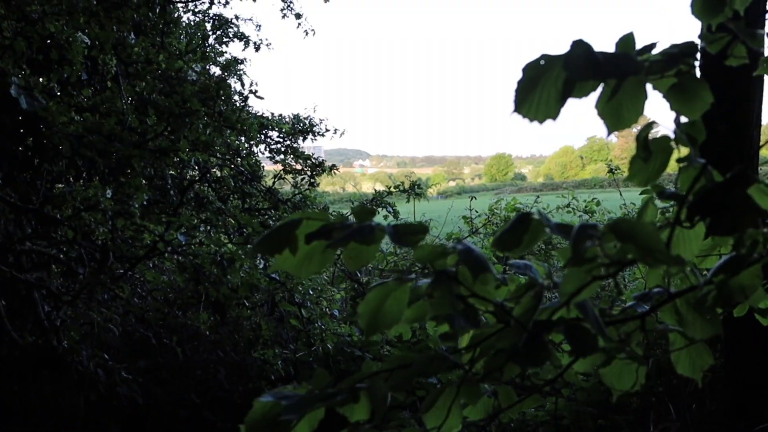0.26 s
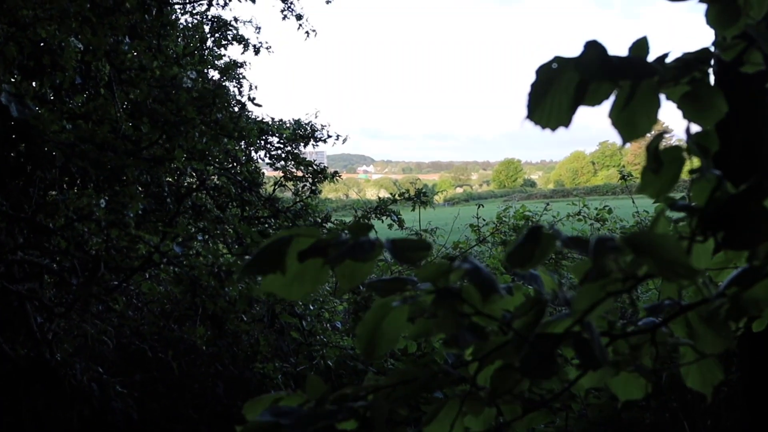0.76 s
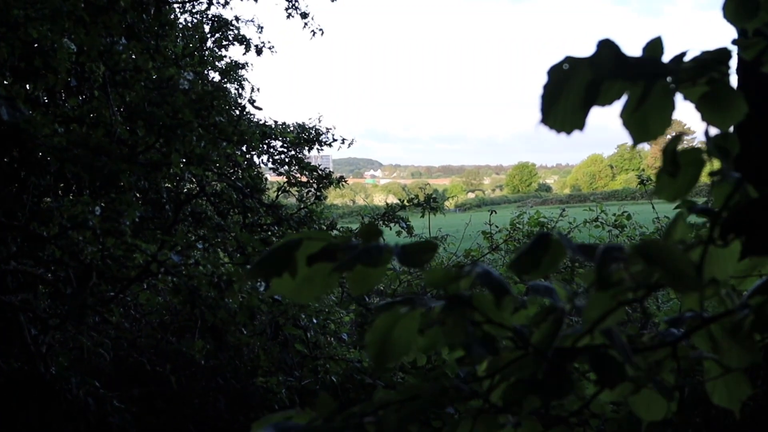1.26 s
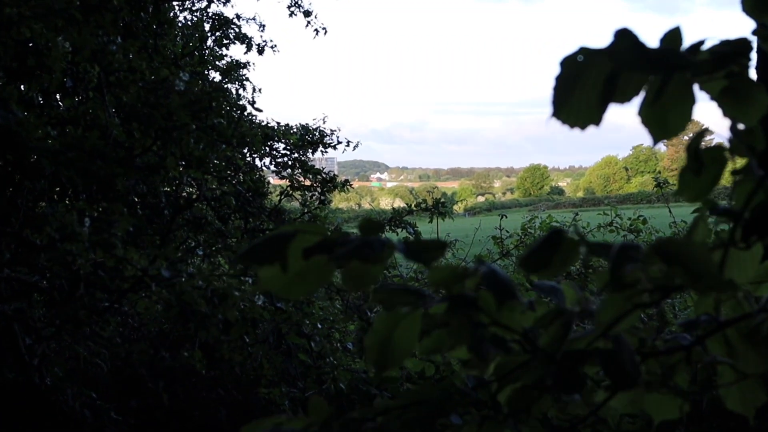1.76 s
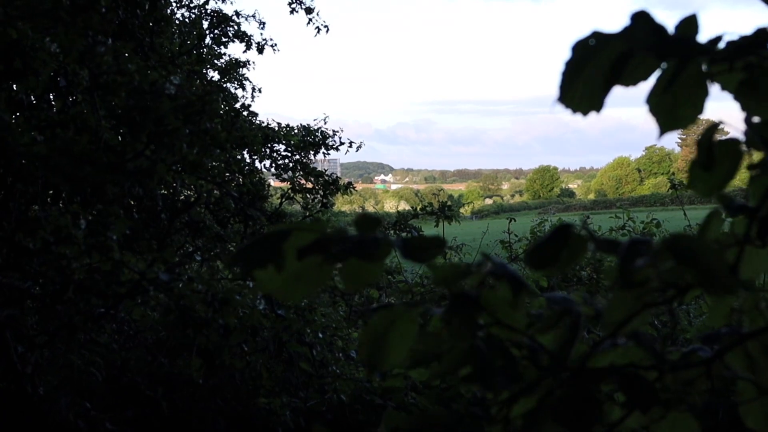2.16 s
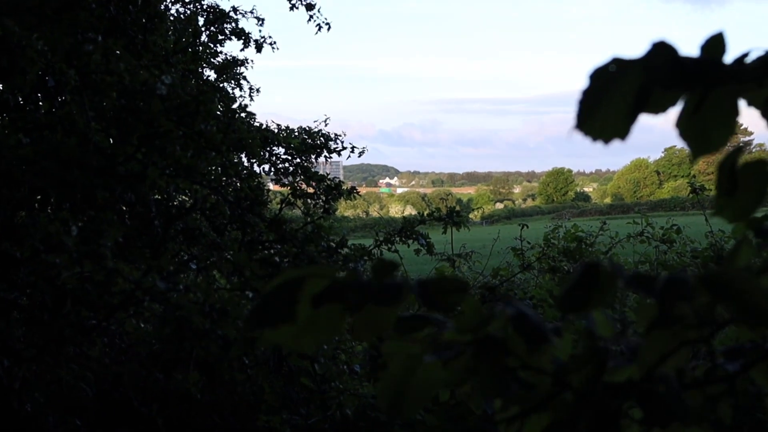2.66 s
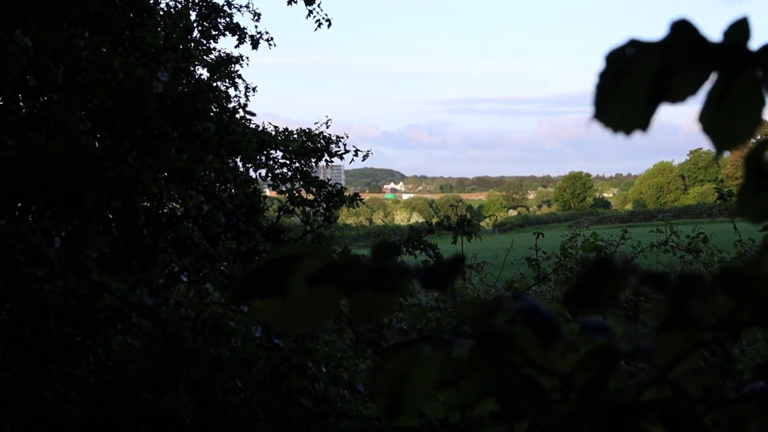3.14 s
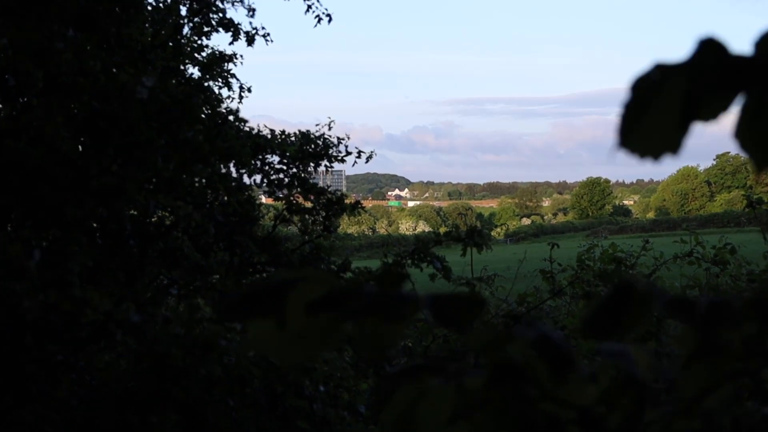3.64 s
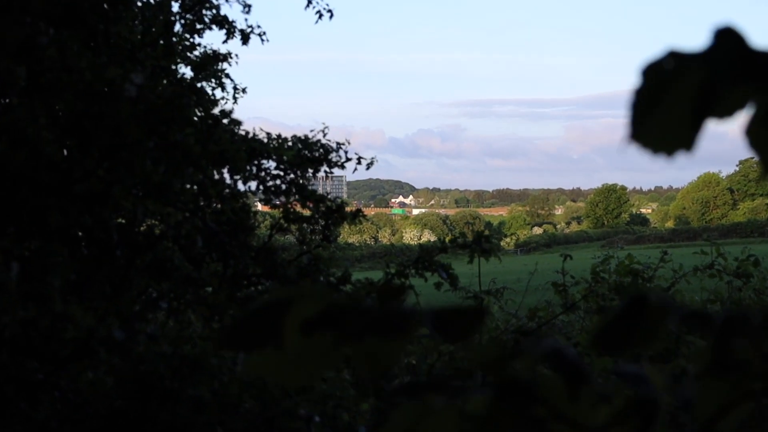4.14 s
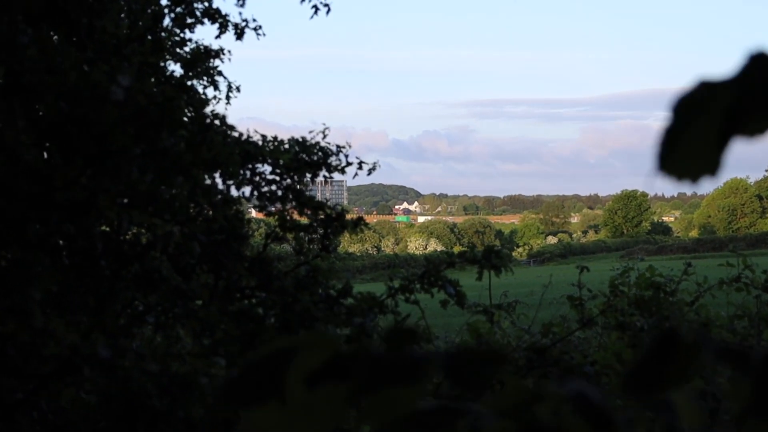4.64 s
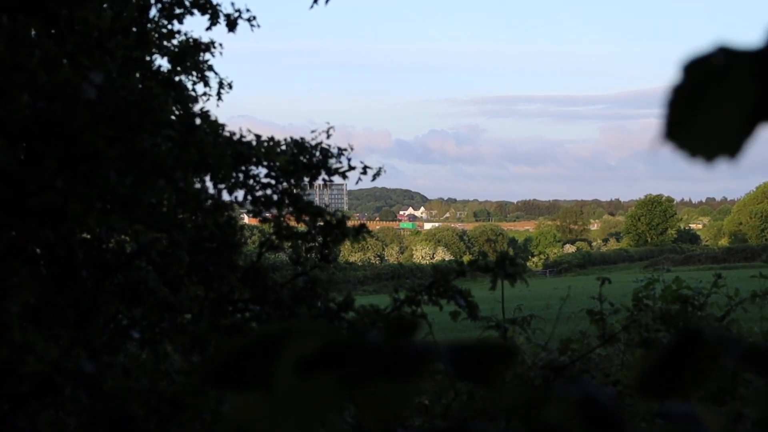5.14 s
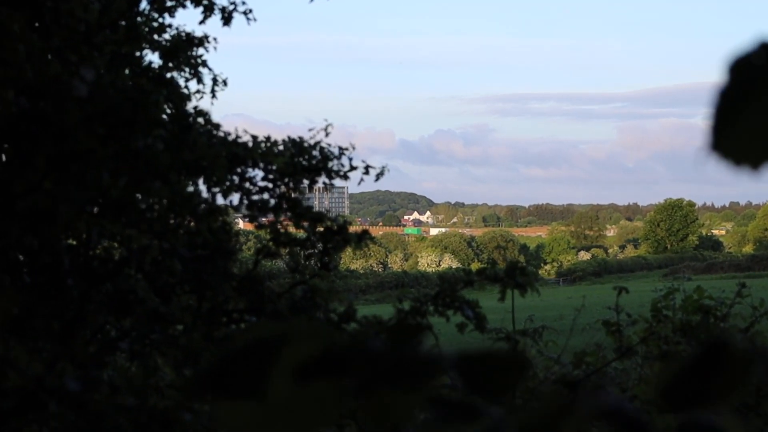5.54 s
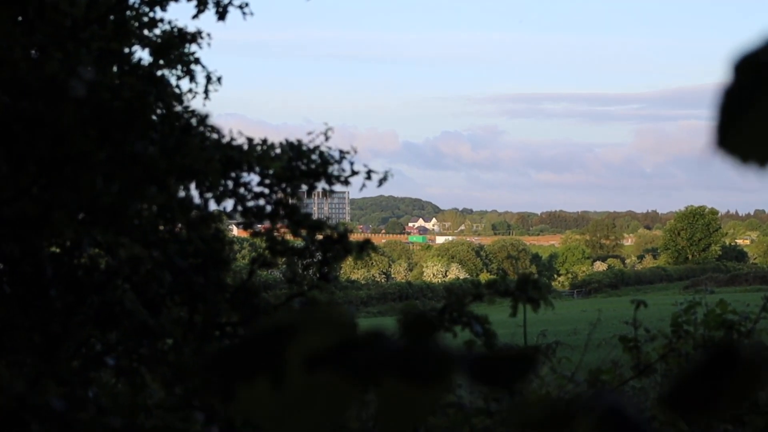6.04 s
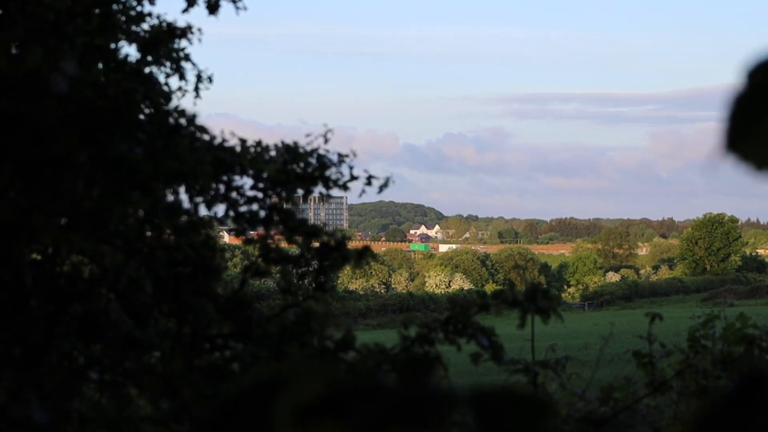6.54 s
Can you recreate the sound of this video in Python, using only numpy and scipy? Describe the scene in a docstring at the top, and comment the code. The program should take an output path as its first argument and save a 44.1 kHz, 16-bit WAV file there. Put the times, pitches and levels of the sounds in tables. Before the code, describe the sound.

Small songbirds sing a dawn chorus at the edge of a wood, their notes lightly echoing among the trees. It opens with loud, high whistles and a quavering call from the treetops, over a dense wash of distant chirping. From about 1 to 2 seconds a buzzing trill pulses four times, while a fainter bird repeats a falling whistle. At about 2 seconds a close warbler starts a fast twitter of sliding chirps, stutters and short buzzes, running into a string of raspy repeated notes that ends near 4.3 seconds. Softer piping and thin high whistles follow until about 5 seconds. Then one bird repeats a bright chink in small groups until around 5.6 seconds, and once more at 6.3. The warbler returns with a brief chirp and buzz near 6.7 seconds. The distant chorus thins gradually, and a faint rush of air lies underneath throughout.

```python
"""A close warbler twitters and buzzes in a dawn chorus at the edge of a wood, over open fields.
Other small birds whistle and trill deeper among the trees. Each note is a near-pure syrinx tone:
it glides for a slur, swings fast in pitch for a buzz. Trunks and leaves scatter the notes.
Behind them lie a thinning distant chorus and a faint rush of air."""
import sys
import numpy as np
from scipy import signal
from scipy.io import wavfile
from scipy.ndimage import uniform_filter1d

SR = 44100
rng = np.random.default_rng(int(sys.argv[2]) if len(sys.argv) > 2 else 0)


def transcribe(u):
    """Save the signal u as a 16-bit wav file named by the first command-line argument.

    u: samples, shape (n,) or (channels, n), limited to [-1, 1]; the rate is SR.
    q: integer samples, one column per channel.
    """
    v = np.clip(np.atleast_2d(u).T, -1, 1)
    q = np.round(v * 32767).astype(np.int16)
    wavfile.write(sys.argv[1], SR, q)


N = 299439


def warbler():
    """Close song: slurs, arches, stutter, flicks, purr and buzzes, then a run of couplets."""
    # start_s, length_s, start_hz, end_hz, level_db
    slurs = [(2.092, 0.032, 4150, 5020, -59.5), (2.136, 0.075, 4474, 3467, -45),
             (2.306, 0.024, 5470, 5160, -54.5), (2.356, 0.034, 5040, 5000, -56),
             (2.301, 0.034, 3397, 3497, -44), (2.449, 0.051, 3790, 4320, -46),
             (2.501, 0.016, 4330, 4730, -48), (2.562, 0.031, 4810, 3950, -46.5),
             (2.718, .014, 3050, 3360, -55), (2.909, 0.032, 3494, 3316, -47.5),
             (3.002, 0.05, 2704, 3226, -51), (3.007, 0.019, 3970, 3560, -52.5),
             (3.081, 0.028, 2480, 2315, -63), (3.313, 0.06, 4566, 4092, -49),
             (3.526, 0.015, 5230, 5450, -57.5), (3.616, 0.085, 4140, 4117, -53),
             (3.74, 0.053, 3995, 4193, -52.5), (6.657, 0.019, 4860, 4035, -45)]
    # start_s, level_db
    flicks = [(2.825, -66.5), (2.965, -63), (3.107, -61), (3.247, -57.5)]
    # length_s, start_hz, middle_hz, end_hz
    flick_shape = (0.015, 5100, 5000, 3200)
    # start_s, length_s, top_hz, level_db
    arches = [(2.332, 0.058, 3965, -46), (3.539, 0.069, 4010, -52.5), (3.852, 0.068, 3453, -57.5)]
    # start_s, length_s, start_hz, end_hz, level_db, swing_rate_hz
    buzz_notes = [(2.542, 0.12, 2925, 2867, -61.5, 49), (2.635, 0.031, 4185, 5970, -53, 112),
                  (2.867, 0.035, 4145, 4160, -48, 86), (3.053, 0.04, 2950, 2520, -59.5, 146),
                  (3.276, 0.039, 4020, 4500, -50, 97), (3.307, 0.055, 4660, 4360, -54.5, 150),
                  (5.952, 0.097, 3660, 3185, -65.5, 53), (6.762, 0.029, 4075, 3870, -50, 106)]
    # clear notes, each led by a rasp: start_s, pitch_hz, level_db
    couplets = [(3.214, 3910, -54.5), (3.43, 3980, -49.5), (3.679, 3800, -54.5), (3.797, 3800, -55.5),
                (3.918, 3890, -53.5), (4.036, 3848, -54.5), (4.164, 3830, -58), (4.286, 4040, -55)]
    # reflections off near trunks: delay_s, gain_db
    trunk_echoes = [(.019, -8.5), (0.041, -16.5)]
    notes = [slur(*row) for row in slurs] + stutter() + [(s, *flick_shape, db) for s, db in flicks]
    pure = whistles(notes, waver=.021, taper=.5)
    for s, length_s, top_hz, db in arches:
        add(pure, s, gain_of(db) * arch(length_s, top_hz))
    buzz = buzzes([buzzy(*row) for row in buzz_notes], throb=1, unevenness=.15, taper=.6)
    buzz += buzzes([rasp(s, db) for s, _, db in couplets], throb=0, unevenness=.23, taper=.93)
    clear_s, drop_hz = .032, 211
    clear_notes = [slur(s, clear_s, hz + drop_hz / 2, hz - drop_hz / 2, db) for s, hz, db in couplets]
    clear = whistles(clear_notes, waver=.016)
    song = (trees(pure, direct_db=-1, leaves_db=-4, wood_db=-8.5, leaves_t60_s=.17)
            + trees(buzz, direct_db=-4, leaves_db=-1.5, wood_db=-10, leaves_t60_s=.1)
            + trees(clear, direct_db=-.5, leaves_db=-5, wood_db=-12, leaves_t60_s=.14))
    for delay_s, db in trunk_echoes:
        add(song, delay_s, gain_of(db) * pure)
    return song + purr()


def arch(length_s, top_hz, rise_share=.68, fall_db=-5):
    """One unbroken note: a rise turning sharply into a softer fall."""
    rise_s = length_s * rise_share
    _, up_hz = contour(rise_s, *sag(.88 * top_hz, top_hz))
    _, down_hz = contour(length_s - rise_s, *sag(top_hz, .72 * top_hz))
    fade_db = np.concatenate([np.zeros(len(up_hz)), np.linspace(0, fall_db, len(down_hz))])
    return syrinx(np.concatenate([up_hz, down_hz]), gain_of(fade_db), taper=.21)


def stutter(start_s=2.497, step_s=.0203, count=4, first_db=-55, growth_db_per_s=49.5):
    """Whistle rows: even falling chips, each louder."""
    # length_s, start_hz, middle_hz, end_hz
    chip_shape = (0.012, 5330, 4950, 4400)
    return [(start_s + t, *chip_shape, first_db + growth_db_per_s * t) for t in step_s * np.arange(count)]


def purr(start_s=2.7305, step_s=.0141, count=5, first_db=-44, growth_db_per_s=78.5, climb_per_s=.9):
    """Even rising chips, each louder and higher."""
    # length_s, start_hz, middle_hz, end_hz
    chip_shape = (.012, 3280, 3480, 3680)
    length_s, *pitches_hz = chip_shape
    chips = []
    for t in step_s * np.arange(count):
        raised_hz = np.multiply(pitches_hz, 1 + climb_per_s * t)
        chips.append((start_s + t, length_s, *raised_hz, first_db + growth_db_per_s * t))
    song = whistles(chips, waver=.015, taper=1)
    return trees(song, direct_db=0, leaves_db=-8.5, wood_db=-11, leaves_t60_s=.12)


def rasp(note_s, note_db, lead_s=.046, length_s=.037, swing_hz=630, swing_rate_hz=160):
    """Buzz row: a softer, arched rasp just ahead of a clear note."""
    pitches_hz = 4050, 4550, 3900
    return note_s - lead_s, length_s, *pitches_hz, note_db - 7, swing_hz, swing_rate_hz


def canopy_birds():
    """Held whistles, a loud quavering call, buzzes and a trill, high up and blurred by the wood."""
    # start_s, length_s, pitch_hz, level_db
    held_notes = [(0.098, 0.062, 5465, -39), (.19, 0.093, 5456, -45.5), (.203, 0.079, 3970, -40),
                  (.3, 0.086, 3863, -49.5), (.63, 0.11, 3730, -58.5), (0.702, 0.093, 3954, -56),
                  (0.954, 0.075, 4456, -53.5), (1.745, 0.18, 7740, -45.5), (1.852, 0.12, 7670, -46)]
    # start_s, length_s, start_hz, middle_hz, end_hz, level_db, swing_hz, swing_rate_hz
    quaver = (0.1, 0.2556, 5902.5, 5828, 5649.5, -40.5, 150, 139.5)
    # start_s, length_s, start_hz, end_hz, level_db, swing_rate_hz
    buzz_notes = [(0, 0.058, 4700, 4680, -48, 102), (0.232, 0.1, 3762, 3512, -45.5, 99),
                  (0.849, .2, 4550, 4650, -55.5, 98), (0.945, 0.14, 7600, 7410, -47.5, 106),
                  (1.025, .05, 6610, 5580, -48.5, 110), (1.04, 0.87, 4480, 4536, -47, 74),
                  (2.935, 0.064, 4160, 3317, -54.5, 76), (3.058, .11, 3720, 4340, -56.5, 80),
                  (3.168, 0.05, 4200, 3944, -51, 61), (3.683, 0.056, 7000, 6580, -71.5, 76),
                  (4.121, 0.081, 7620, 7620, -74, 78)]
    pure = whistles([held(*row) for row in held_notes], waver=.005, taper=.3)
    pure += buzzes([quaver], throb=0, unevenness=.3, taper=.5)
    buzz = buzzes([buzzy(*row) for row in buzz_notes] + trill(), throb=.35, unevenness=.2, taper=.45)
    return (trees(pure, direct_db=-3.5, leaves_db=-5, wood_db=-11, leaves_t60_s=.25)
            + trees(buzz, direct_db=-5, leaves_db=-2.5, wood_db=-7, leaves_t60_s=.22))


def trill(start_s=1.056, step_s=.164, count=4, first_db=-42.5, fade_db_per_s=1.6):
    """Buzz rows: even surges of one wide buzz, each slightly weaker."""
    # length_s, start_hz, middle_hz, end_hz
    surge_shape = (.15, 5350, 5280, 4700)
    swing_hz, swing_rate_hz = 843, 57
    return [(start_s + t, *surge_shape, first_db - fade_db_per_s * t, swing_hz, swing_rate_hz)
            for t in step_s * np.arange(count)]


def clear_singer():
    """Second close bird, in the open: almost dry slurs."""
    # start_s, length_s, start_hz, end_hz, level_db
    slurs = [(3.279, 0.023, 3130, 3360, -52.5), (3.309, 0.023, 3430, 3030, -52),
             (3.39, .039, 3270, 3154, -52)]
    song = whistles([slur(*row) for row in slurs], waver=.004, taper=.35)
    return trees(song, direct_db=0, leaves_db=-18.5, wood_db=-20.5, leaves_t60_s=.1)


def pipers(shimmer_hz=63, shimmer_rate_hz=260):
    """Soft held notes at middle distance; the thin, high ones shimmer in pitch."""
    # both: start_s, length_s, pitch_hz, level_db
    piping_notes = [(4.365, 0.1, 3695, -53), (4.54, 0.034, 3630, -61.5), (4.593, 0.054, 3638, -52)]
    thin_notes = [(4.472, 0.072, 5240, -67.5), (4.548, 0.048, 5260, -59), (4.648, 0.12, 5250, -60),
                  (4.74, 0.1, 5195, -64), (4.944, 0.048, 5240, -64), (5.002, 0.057, 5210, -65)]
    song = whistles([held(*row) for row in piping_notes], waver=.008, taper=.6)
    shimmering = [(*held(*row), shimmer_hz, shimmer_rate_hz) for row in thin_notes]
    song += buzzes(shimmering, throb=0, unevenness=.02, taper=.4)
    return trees(song, direct_db=-.5, leaves_db=-6, wood_db=-11, leaves_t60_s=.2)


def chinker():
    """One bird repeats a bright, slightly falling chink in small groups."""
    # start_s, level_db
    chinks = [(5.076, -57.5), (5.154, -59.5), (5.316, -56.5), (5.357, -59), (5.404, -62.5), (5.558, -59.5),
              (5.593, -58.5), (6.328, -55)]
    # length_s, start_hz, middle_hz, end_hz
    chink_shape = (.036, 4210, 4110, 4070)
    song = whistles([(s, *chink_shape, db) for s, db in chinks], waver=.014, taper=.25)
    return trees(song, direct_db=-2, leaves_db=-5.5, wood_db=-13, leaves_t60_s=.17)


def ticks(length_s=.0031, half_span_hz=1700):
    """Sharp ticks: one very fast downward sweep each."""
    # start_s, level_db, centre_hz
    sweeps = [(0.737, -58.5, 7540), (4.355, -59.5, 7190)]
    out = np.zeros(N)
    for s, db, centre_hz in sweeps:
        _, hz = contour(length_s, centre_hz + half_span_hz, centre_hz, centre_hz - half_span_hz)
        add(out, s, gain_of(db) * syrinx(hz))
    return trees(out, direct_db=6, leaves_db=-.5, wood_db=-16, leaves_t60_s=.059)


def distant_birds(twitter_s=.042, twitter_end_ratio=.86):
    """Deep in the wood: faint slurs, a repeated falling whistle, mellow low notes, twittering."""
    # start_s, length_s, start_hz, end_hz, level_db
    slurs = [(0.133, 0.059, 3590, 2940, -61.5), (.195, 0.086, 2876, 1966, -68.5),
             (0.647, 0.044, 3490, 2700, -65.5), (0.89, 0.023, 3240, 2880, -65),
             (1.15, 0.09, 3020, 3520, -60), (1.34, 0.08, 2950, 3620, -62.5),
             (1.483, 0.057, 3330, 3150, -61.5), (1.611, .06, 2880, 3410, -63),
             (1.807, 0.026, 1770, 2120, -65.5), (1.832, 0.029, 2980, 3410, -60.5),
             (1.938, 0.055, 3500, 2890, -60), (2.005, .12, 2117, 1978, -65.5),
             (1.988, 0.095, 3670, 3090, -61), (2.335, 0.082, 2030, 1625, -74),
             (2.333, 0.078, 2930, 2616, -64.5), (4.11, 0.055, 2775, 3190, -71),
             (5.029, 0.035, 3480, 3650, -64.5), (5.225, 0.05, 3950, 3120, -69.5),
             (5.329, 0.05, 3650, 3026, -62.5), (5.542, 0.058, 2880, 3800, -69),
             (5.698, 0.12, 2665, 3150, -75.5), (5.755, 0.31, 6630, 6180, -77.5),
             (6.041, 0.073, 3230, 2970, -67.5), (6.387, 0.049, 5050, 5680, -71.5),
             (6.395, 0.076, 3470, 3236, -70)]
    # start_s, level_db
    falls = [(1.086, -64.5), (1.252, -60.5), (1.41, -59), (1.561, -61.5), (1.705, -62.5), (1.866, -62)]
    # length_s, start_hz, middle_hz, end_hz
    fall_shape = (0.099, 3750, 2760, 2310)
    # start_s, length_s, pitch_hz, level_db
    low_notes = [(0.418, 0.17, 1057, -75), (1.554, 0.13, 1734, -71), (1.85, 0.043, 2140, -67),
                 (2.308, 0.055, 2155, -71.5), (2.54, .1, 1894, -63.5), (5.656, 0.13, 2220, -81),
                 (5.918, 0.086, 2110, -85.5)]
    # start_s, start_hz, level_db
    twitter_notes = [(3.917, 2930, -69.5), (4.515, 2943, -69.5), (4.739, 2946, -74.5), (4.85, 2950, -72),
                     (4.92, 2980, -74.5), (5.035, 2480, -80.5), (5.105, 2540, -77.5), (5.195, 2500, -79),
                     (5.268, 2576, -74.5), (5.35, 2530, -80), (5.525, 2640, -75), (6.15, 2465, -84),
                     (6.53, 3030, -77)]
    glide_rows = [slur(*row) for row in slurs] + [(s, *fall_shape, db) for s, db in falls]
    glides = whistles(glide_rows, waver=.011, taper=.3)
    out = trees(glides, direct_db=-2.3, leaves_db=-5.5, wood_db=-9.5, leaves_t60_s=.11)
    low = whistles([held(*row) for row in low_notes], waver=.013, taper=.22)
    twitter_rows = [slur(s, twitter_s, hz, twitter_end_ratio * hz, db) for s, hz, db in twitter_notes]
    twitter = whistles(twitter_rows, waver=.016, taper=.45)
    out += trees(low, direct_db=1.5, leaves_db=-12, wood_db=-19, leaves_t60_s=.12)
    return out + trees(twitter, direct_db=-2, leaves_db=-5, wood_db=-10, leaves_t60_s=.12)


def far_chorus(chirps_db=-71, count=260):
    """Many far birds: a blurred wash with short random slurs standing out."""
    # time_s, level_db
    chorus_level = [(0, -54), (.45, -54.5), (.8, -55), (1.6, -55.5), (2.05, -61), (3, -64.5), (4.3, -70),
                    (5, -71.5), (6.2, -74), (6.79, -70.5)]
    # frequency_hz, density_db
    spectrum = [(1500, -43.5), (2500, -20.5), (3300, -4.5), (4100, 2), (5000, -4), (5800, -5.5),
                (6800, -12), (8000, -19), (9500, -42.5)]
    when, length, pitch, glide, bend, size = rng.random((count, 6)).T
    length_s = .029 + .036 * length
    middle_hz = 2450 * 1.85 ** pitch
    start_hz, end_hz = middle_hz * (.95 + .2 * glide), middle_hz * (1.05 - .37 * bend)
    relative_db = 6 * size + .5 * at_hz(spectrum, middle_hz)
    rows = np.transpose([when * N / SR, length_s, start_hz, middle_hz, end_hz, relative_db])
    chirps = trees(whistles(rows, waver=.0099), direct_db=-3, leaves_db=-3.5, wood_db=-7, leaves_t60_s=.072)
    gain = gain_curve(chorus_level)
    # single voices fade less than the wash
    voices = gain_of(chirps_db) * unit_rms(np.sqrt(gain) * chirps)
    return voices + gain * wash(spectrum, patchy_db=3.4)


def air():
    """Low rush over the fields with one soft swell, and a fine, fading hiss."""
    # levels: time_s, level_db
    rush_level = [(0, -75), (1, -73.5), (2.5, -74.5), (3.3, -75), (4.2, -77.5), (5.1, -76.5), (5.35, -79),
                  (6, -83), (6.79, -84.5)]
    swell_level = [(4, -110), (4.58, -77.5), (4.72, -85.5), (4.9, -71.5), (5.1, -81), (5.3, -106)]
    hiss_level = [(0, -62.5), (.4, -62.5), (1.2, -68.5), (2.76, -76.5), (4.5, -77.5), (6.79, -79)]
    # spectra: frequency_hz, density_db
    rush_spectrum = [(140, -44), (210, -31.5), (300, -17.5), (420, -14), (600, -4.5), (800, 1.5), (1050, 3),
                     (1400, -0.5), (2000, -11), (6000, -39)]
    swell_spectrum = [(700, -33.5), (1100, -2.5), (1350, 10), (1600, 1.5), (2000, -36.5)]
    hiss_spectrum = [(1000, -20), (2000, 6.5), (4000, 1), (7500, 9.5), (9000, 4.5), (10500, 1), (12500, 2),
                     (15000, -4.5)]
    rush = gain_curve(rush_level) * wash(rush_spectrum, patchy_db=2)
    swell = gain_curve(swell_level) * wash(swell_spectrum, patchy_db=3)
    hiss = gain_curve(hiss_level) * wash(hiss_spectrum, patchy_db=.9)
    return rush + swell + hiss


def syrinx(hz, envelope=1, taper=.2, flutter_db=2):
    """Near-pure tone that swells, flutters and fades with the air flow; unit rms."""
    swell = signal.windows.tukey(len(hz), taper)
    flow = swell * gain_of(flutter_db * wander(np.arange(len(hz)) / SR, 110))
    return unit_rms(envelope * flow * np.sin(2 * np.pi * np.cumsum(hz) / SR))


def whistles(rows, waver, taper=.2):
    """Gliding pure notes; pitch drifts by the share waver."""
    out = np.zeros(N)
    for s, length_s, start_hz, middle_hz, end_hz, db in rows:
        t, hz = contour(length_s, start_hz, middle_hz, end_hz)
        add(out, s, gain_of(db) * syrinx(hz * (1 + waver * wander(t, 220)), taper=taper))
    return out


def buzzes(rows, throb, unevenness, taper):
    """Notes with a fast pitch swing; throb makes each swing loudest on its way up."""
    out = np.zeros(N)
    for s, length_s, start_hz, middle_hz, end_hz, db, swing_hz, swing_rate_hz in rows:
        t, hz = contour(length_s, start_hz, middle_hz, end_hz)
        phase = 2 * np.pi * np.cumsum(swing_rate_hz * (1 + unevenness * wander(t, 60))) / SR
        note = syrinx(hz + swing_hz * np.sin(phase), np.exp(throb * np.cos(phase)), taper)
        add(out, s, gain_of(db) * note)
    return out


def held(s, length_s, hz, db, scoop_hz=15, droop_hz=44.2):
    """Whistle row: one pitch, starting a little flat and drooping at the end."""
    return s, length_s, hz - scoop_hz, hz, hz - droop_hz, db


def slur(s, length_s, start_hz, end_hz, db):
    """Whistle row: a glide, fastest at its high end."""
    return s, length_s, *sag(start_hz, end_hz), db


def buzzy(s, length_s, start_hz, end_hz, db, swing_rate_hz, lift_share=.015, swing_share=.078):
    """Buzz row: a slightly arched glide, its swing proportional to pitch."""
    middle_hz = (start_hz + end_hz) / 2 * (1 + lift_share)
    return s, length_s, start_hz, middle_hz, end_hz, db, swing_share * middle_hz, swing_rate_hz


def sag(start_hz, end_hz, range_share=.13):
    """Start, middle and end pitch, bowed below the straight glide."""
    return start_hz, (start_hz + end_hz) / 2 - range_share * abs(end_hz - start_hz), end_hz


def contour(length_s, start_hz, middle_hz, end_hz):
    """Time axis and pitch parabola of one note."""
    t = np.arange(max(int(length_s * SR), 64)) / SR
    parabola = np.polyfit([0, .5, 1], [start_hz, middle_hz, end_hz], 2)
    return t, np.polyval(parabola, t / t[-1])


def trees(x, direct_db, leaves_db, wood_db, leaves_t60_s, echoes_per_s=2500, wood_rise_s=.043):
    """Direct sound, quick scatter from near leaves and the long tail of the wood."""
    # frequency_hz, t60_s
    wood_decay = [(2000, 0.7), (3500, 0.85), (5500, 0.73), (8000, 0.57)]
    t = np.arange(SR) / SR
    leaves, wood = rng.standard_normal((2, SR)) * (rng.random((2, SR)) < echoes_per_s / SR)
    leaves *= gain_of(-60 * t / leaves_t60_s) * (t > .002)
    hz, frame_s, bins = signal.stft(wood * (1 - np.exp(-t / wood_rise_s)), SR, nperseg=256)
    bins *= gain_of(-60 * frame_s / at_hz(wood_decay, hz)[:, None])
    wood = signal.istft(bins, SR, nperseg=256)[1][:SR]
    echoes = gain_of(leaves_db) * leaves / np.linalg.norm(leaves)
    echoes += gain_of(wood_db) * wood / np.linalg.norm(wood)
    return gain_of(direct_db) * x + signal.fftconvolve(x, echoes)[:N]


def wash(spectrum, patchy_db):
    """Diffuse noise, its level drifting in patches of time and pitch; unit rms."""
    hz = np.fft.rfftfreq(1024, 1 / SR)
    real, imag, patches = rng.standard_normal((3, N // 256 + 5, len(hz)))
    patches = uniform_filter1d(patches, size=14, axis=0)
    patches = unit_rms(uniform_filter1d(patches, size=8, axis=1))
    bins = (real + 1j * imag) * gain_of(at_hz(spectrum, hz) + patchy_db * patches)
    return unit_rms(signal.istft(bins.T, nperseg=1024, noverlap=768)[1][:N])


def wander(t, max_hz):
    """Smooth random drift, about unit rms."""
    speed, phase = rng.random((2, 12, 1))
    return np.sin(2 * np.pi * (max_hz * speed * t + phase)).sum(0) / np.sqrt(len(speed) / 2)


def gain_of(db):
    """Decibels to amplitude."""
    return 10 ** (np.asarray(db) / 20)


def gain_curve(points):
    """Level table to gain per sample."""
    return gain_of(np.interp(np.arange(N) / SR, *np.transpose(points)))


def unit_rms(x):
    """Scales to rms 1."""
    return x / np.sqrt(np.mean(x ** 2) + 1e-20)


def at_hz(points, hz):
    """Table lookup on a log-frequency axis."""
    table_hz, values = np.transpose(points)
    return np.interp(np.log(hz + 1), np.log(table_hz), values)


def add(mix, start_s, sound):
    """Mixes a sound in at start_s."""
    part = mix[max(round(start_s * SR), 0):][:len(sound)]
    part += sound[:len(part)]


def scene():
    """Each singer at its own depth in the wood, over chorus and air; mono."""
    birds = ticks() + canopy_birds() + warbler() + clear_singer() + pipers() + chinker()
    return (birds + distant_birds() + far_chorus() + air())[None]


def record(dry, bass_cut_hz=170, band_limit_hz=15500):
    """Bass cut and steep band limit."""
    thin = signal.sosfilt(signal.butter(2, bass_cut_hz, "highpass", fs=SR, output="sos"), dry)
    lowpass = signal.firwin(511, band_limit_hz, window=("kaiser", 9), fs=SR)
    return signal.oaconvolve(thin, lowpass[None], "same")


dry = scene()
out = record(dry)
transcribe(out)
```